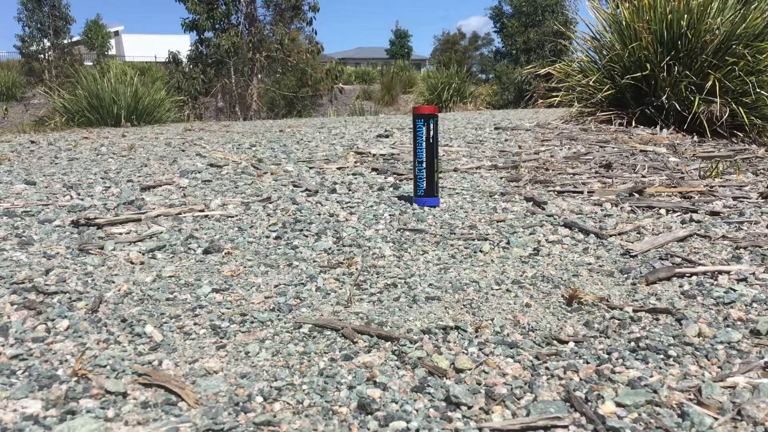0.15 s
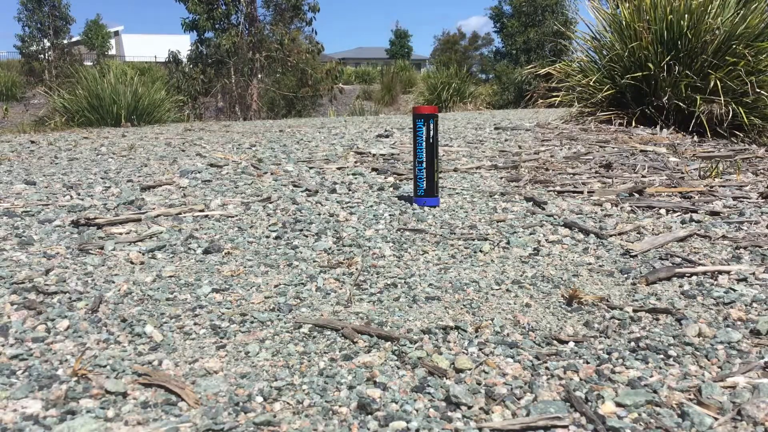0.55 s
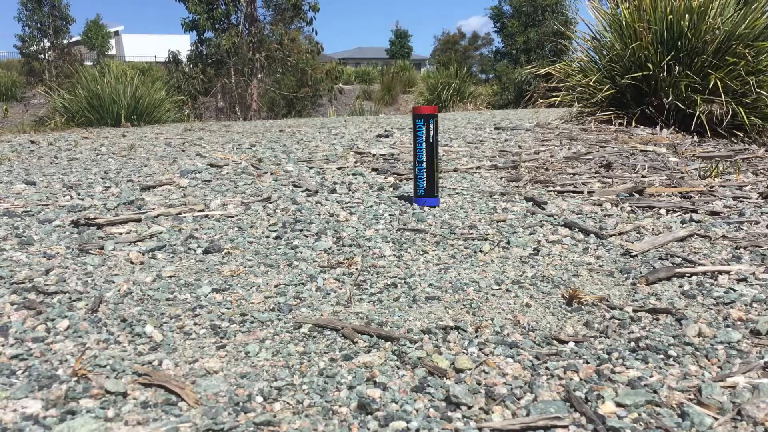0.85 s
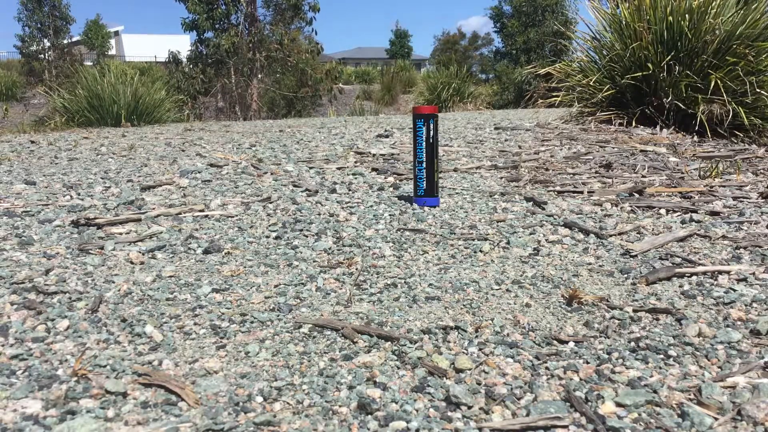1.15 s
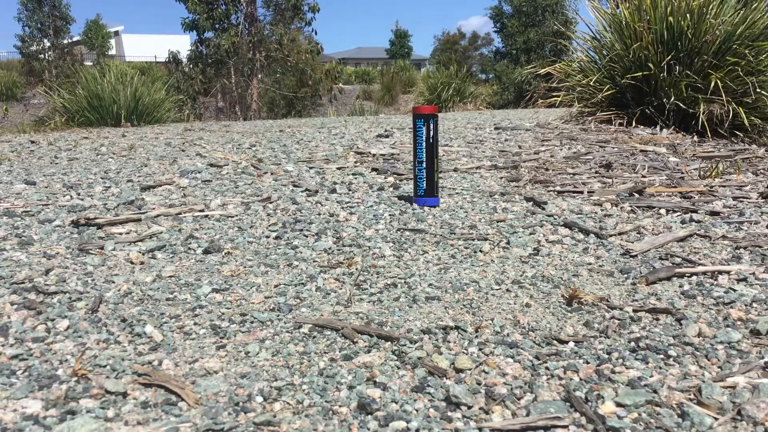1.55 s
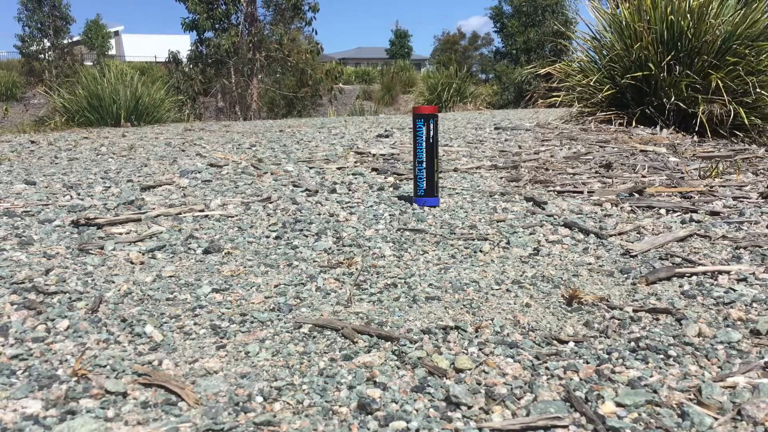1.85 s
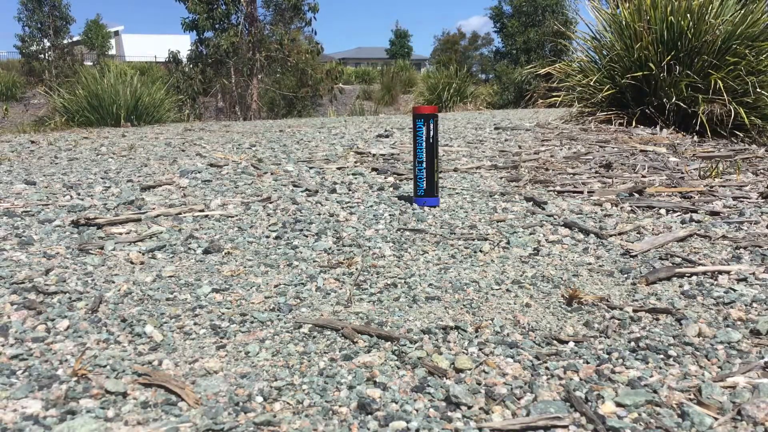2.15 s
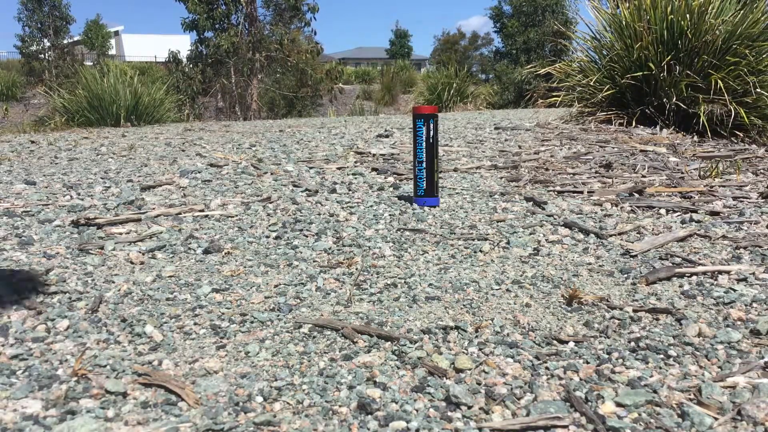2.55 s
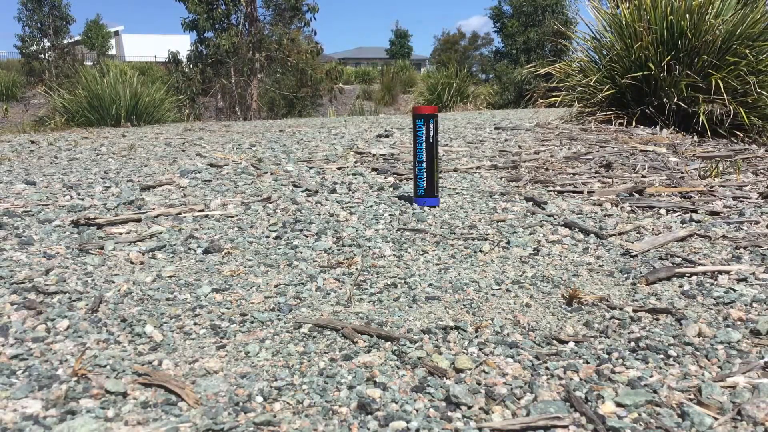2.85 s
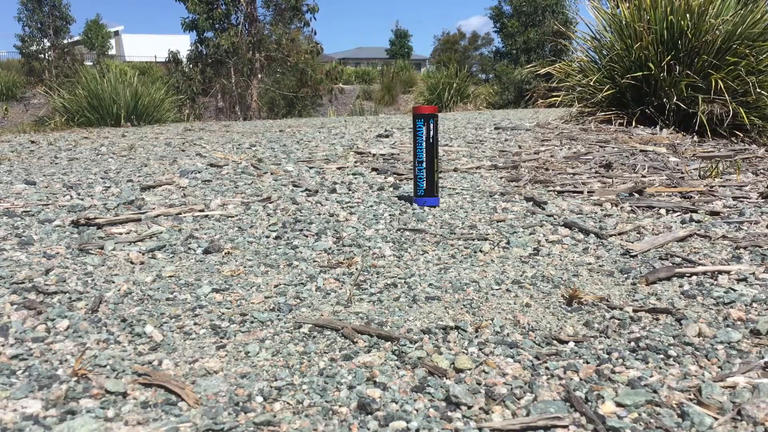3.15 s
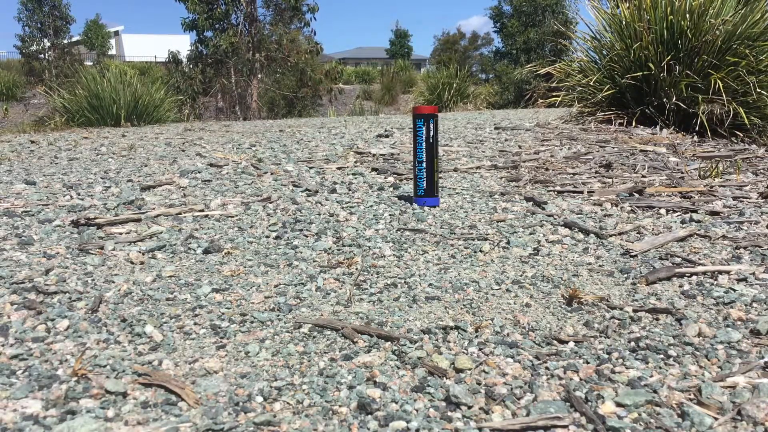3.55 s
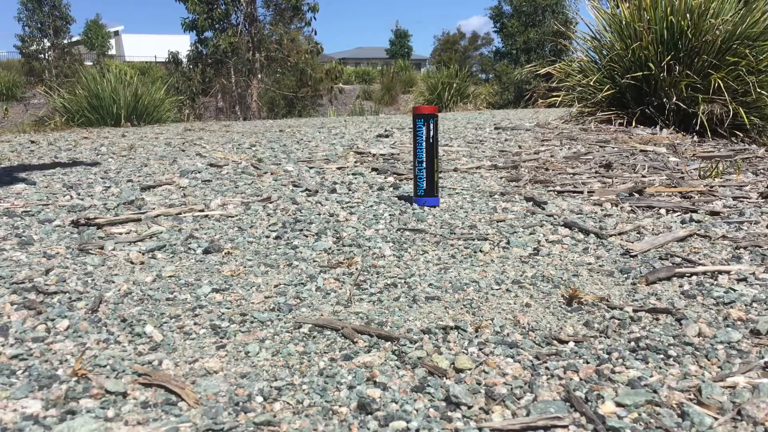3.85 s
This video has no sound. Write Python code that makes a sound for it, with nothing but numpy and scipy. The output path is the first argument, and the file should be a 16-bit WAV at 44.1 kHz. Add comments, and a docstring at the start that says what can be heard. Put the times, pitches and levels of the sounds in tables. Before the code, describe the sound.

Someone shifts lightly on loose stones, pauses, then takes three crisp, crunching gravel steps with dull heel knocks and snapping pebbles, near the microphone in open air with little echo.

```python
"""Footsteps on dry gravel

Someone shifts their feet on dry gravel outdoors, then takes three crunching steps close by.
Damped rings make heel knocks and snapping pebbles; crowds of random stone contacts make crunch and grit.
A soft rustling hiss of filtered noise grows as the walker nears; a low distant rumble lies under it all."""
import sys
import numpy as np
from scipy import signal
from scipy.fft import rfft, irfft
from scipy.io import wavfile
from scipy.ndimage import uniform_filter1d

SR = 44100
rng = np.random.default_rng(int(sys.argv[2]) if len(sys.argv) > 2 else 0)


def wav_out(sig):
    """Save sig, one row per channel (or a flat mono array), as 16-bit PCM at SR to the path in sys.argv[1]."""
    wavfile.write(sys.argv[1], SR, np.round(np.clip(np.atleast_2d(sig).T, -1, 1) * 32767).astype(np.int16))


N = 176400
TIME = np.arange(N) / SR
LEAD_S = 0.003   # a swell reaches its peak this long after its buffer starts


def from_db(db):
    """Amplitude factor of a level in dB."""
    return 10 ** (np.asarray(db) / 20)


def rms_one(x):
    """Scale a signal to rms 1."""
    return x / np.sqrt(np.mean(x ** 2) + 1e-20)


def add(out, s, sound):
    """Mix a sound in at a time in seconds."""
    i = int(np.clip(s * SR, 0, N - 1))
    out[i:i + len(sound)] += sound[:N - i]


def colour(x, spectrum, size=8192):
    """Minimum-phase filter with the shape of the given spectrum; the result has rms 1."""
    hz, db = np.transpose(spectrum)
    bin_hz = np.arange(size // 2 + 1) * SR / size
    gain = from_db(np.interp(np.log(bin_hz + 1), np.log(hz), db))
    # folding the cepstrum onto positive times makes the response causal
    cepstrum = irfft(np.log(gain))[:size // 2]
    cepstrum[1:] *= 2
    response = irfft(np.exp(rfft(cepstrum, size)))
    # the end of the signal runs in ahead of its start, so the filter starts full
    filtered = signal.fftconvolve(np.r_[x[-size:], x], response)
    return rms_one(filtered[size:size + N])


def swell(peak_s, size=1300):
    """A short rounded rise, lasting peak_s, and decay; height 1, with its peak at LEAD_S."""
    t = np.maximum((np.arange(size) / SR - LEAD_S) / peak_s + 1, 0)
    return (t * np.exp(1 - t)) ** 2


def ring(hz, cycles, size=1300):
    """A heavily damped ring: a sine of random phase under a swell that rises for some cycles."""
    phase = 2 * np.pi * (np.arange(size) / SR * hz + rng.random())
    return swell(cycles / hz) * np.sin(phase)


def press(start, length, attack, release):
    """Pressure of a foot: linear attack, hold to the given length, exponential release."""
    t = np.maximum(TIME - start, 0)
    return np.minimum(t / attack, 1) * np.exp(-np.maximum(t - length, 0) / release)


def grains(per_s, spread_db, cycles, share, own_db, count=30, size=1100):
    """Random contacts of uneven strength, each striking a share of damped modes; evened in level."""
    strength = from_db(spread_db * np.minimum(rng.exponential(1, N), 4))
    at = np.flatnonzero(rng.random(N) < per_s / SR)
    out = np.zeros(N)
    draws, signs = rng.random((2, count, 4000)), rng.choice([-1, 1], N)
    for k, hz in enumerate(np.geomspace(250, 15000, count)):
        # a mode falls by 60 dB within the given number of cycles
        radius = from_db(-60 * hz / (cycles * SR))
        angle = 2 * np.pi * hz / SR
        chance, tone = draws[:, k, at % draws.shape[-1]]
        sign = np.roll(signs, k)[at]
        struck = np.zeros(N)
        # own_db is how far the modes of one contact may differ in level
        struck[at] = strength[at] * sign * (chance < share) * from_db(own_db * tone)
        numerator = [1 - radius, 0, radius - 1]
        denominator = [1, -2 * radius * np.cos(angle), radius * radius]
        out += signal.lfilter(numerator, denominator, struck + 1e-18)
    power = uniform_filter1d(uniform_filter1d(out ** 2, size), size)
    return out / np.sqrt(np.abs(power) + 1e-12)


def waver(per_s, size=200):
    """Slow chance between -1 and 1: random points joined by straight lines."""
    return np.interp(TIME * per_s + rng.random(), np.arange(size), rng.uniform(-1, 1, size))


def wandering_band(hz):
    """A narrow band of noise that swells, sinks and drifts in pitch, as noise on a moving carrier."""
    width_hz, changes_per_s = 490, 7
    wander = 0.075   # largest drift, as a fraction of the pitch
    swell_db = 6   # largest swing up or down
    lowpass = signal.butter(2, width_hz / 2, fs=SR, output="sos")
    narrow = signal.sosfilt(lowpass, rng.standard_normal((2, N)))
    phase = 2 * np.pi * np.cumsum(hz * (1 + wander * waver(changes_per_s))) / SR
    band = narrow[0] * np.cos(phase) + narrow[1] * np.sin(phase)
    return from_db(swell_db * waver(changes_per_s)) * rms_one(band)


def background():
    """Distant rumble as low noise, and a soft rustling hiss of shifting colour."""
    # loudness curve of the hiss: t/s, level/dB
    hiss_level = [(0, -74.5), (.14, -69), (.27, -64), (.36, -69.5), (.5, -69), (.6, -73), (.88, -71),
                  (1.02, -67.5), (1.25, -76), (1.62, -69.5), (1.88, -72.5), (2.08, -60.5), (2.33, -60.5),
                  (2.6, -60.5), (2.8, -57), (3.3, -57), (3.58, -57.5), (3.73, -62.5), (4, -56.5)]
    # broadband spectrum of the hiss: f/Hz, relative level per Hz/dB
    hiss_spectrum = [(200, 7), (650, 9), (850, -4), (1200, 6.5), (1750, -1.5), (2500, -1), (4600, -0.5),
                     (6500, -8), (9000, -11.5), (15000, -17.5)]
    # narrow bands that wander in the hiss: centre f/Hz, level against the broadband hiss/dB
    hiss_bands = [(2430, -6.5), (3400, -11.5), (4450, -12.5)]
    # spectrum of the distant rumble: f/Hz, relative level per Hz/dB
    rumble_spectrum = [(22, -65), (40, -16.5), (60, 2), (110, 0), (290, -5.5), (450, -15), (650, -18),
                       (1000, -26), (2000, -55.5), (15000, -46)]
    rumble_db = -59
    rustle = colour(rng.standard_normal(N), hiss_spectrum)
    rustle = rustle + sum(from_db(db) * wandering_band(hz) for hz, db in hiss_bands)
    hiss = from_db(np.interp(TIME, *np.transpose(hiss_level))) * rms_one(rustle)
    return hiss + from_db(rumble_db) * colour(rng.standard_normal(N), rumble_spectrum)


def stone_response(db, size):
    """The snap itself, then ringing stone modes and rattling neighbours, relatively weaker for loud snaps."""
    # modes of the struck stones: f/Hz, gain over the snap/dB
    stone_modes = [(940, 4.5), (1250, 7), (2570, 9.5), (3450, 3), (4450, 5.5)]
    ring_spread = 0.027   # pitch spread between stones, as a fraction
    ring_s, rattle_s = 0.0035, 0.0038   # decay times
    rattle_db = -15
    full_db, loss = -40, 0.35   # above this snap level, dB lost per dB
    t = np.arange(size) / SR
    hits = rng.standard_normal(size) * (rng.random(size) < 0.08)
    rattle = from_db(rattle_db) * hits * np.exp(-t / rattle_s)
    modes = 0
    for mode_hz, mode_db in stone_modes:
        stone_hz = mode_hz * (1 + ring_spread * rng.standard_normal())
        modes = modes + from_db(mode_db) * np.cos(2 * np.pi * stone_hz * t)
    # the factor keeps the gain at resonance independent of ring time
    ringing = modes * np.exp(-t / ring_s) * 2 / (ring_s * SR)
    response = from_db(-loss * max(db - full_db, 0)) * (rattle + ringing)
    response[0] = 1
    return response


def pebbles(size=1300):
    """Each pebble slips, then snaps with a crack that sets stones ringing and neighbours rattling."""
    # single pebbles snapping: t/s of the peak, level/dB, f/Hz
    snaps = [(.053, -43.5, 3155), (.079, -46, 2980), (0.1015, -36, 3250), (.1834, -36.5, 3170),
             (0.2247, -37, 3270), (0.2371, -37.5, 1955), (.4228, -41, 2050), (.452, -40.5, 2990),
             (0.474, -40.5, 2670), (0.49, -47, 2950), (0.639, -42.5, 2780), (.6479, -42, 3650),
             (0.6743, -41, 2700), (0.7085, -48.5, 2580), (0.7477, -44, 3020), (.7611, -45, 2160),
             (.827, -46.5, 2980), (0.88, -32, 1870), (.9546, -47.5, 2910), (1.529, -49, 1780),
             (1.5774, -45.5, 1370), (1.6025, -47, 1970), (1.7005, -44, 1570), (1.7388, -49, 1390),
             (1.7754, -48.5, 1320), (1.8037, -45.5, 1760), (1.827, -51, 1740), (1.9296, -45.5, 2110),
             (1.9604, -42, 2450), (2.065, -29.5, 1780), (2.078, -39, 2600), (2.209, -40.5, 2220),
             (2.5723, -41, 1940), (2.8196, -28.5, 2540), (2.87, -23, 2100), (2.885, -19, 1635),
             (2.934, -36, 4060), (2.9614, -31, 2700), (2.968, -30.5, 1380), (3.1162, -27, 3535),
             (3.1248, -31.5, 3020), (3.153, -28, 3287), (3.1616, -30.5, 3680), (3.2181, -30.5, 3800),
             (3.28, -26.5, 2590), (3.316, -33, 2020), (3.3397, -15, 1595), (3.3635, -23, 1830),
             (3.4141, -10.5, 1210), (3.435, -35, 4600), (3.4584, -30, 1630), (3.4648, -21, 1780),
             (3.4840, -14.5, 3697), (3.4850, -15.5, 1260), (3.5676, -36, 1935), (3.6294, -33.5, 2170),
             (3.6668, -33.5, 1480), (3.757, -38.5, 2060), (3.8049, -25, 2660), (3.8733, -32, 2030),
             (3.877, -26, 1380), (3.9152, -20, 1270), (3.9172, -15, 2335), (3.9665, -40, 2020),
             (3.9887, -28.5, 1400)]
    # tiny bright chips: t/s of the peak, level/dB, f/Hz
    chips = [(3.088, -56, 14500), (3.102, -44.5, 11400), (3.153, -46.5, 13200)]
    snap_cycles, chip_cycles = 0.43, 8   # rise times in cycles
    slip_s, slip_db = 0.00175, -25.5   # lead and level of the slip against the snap
    crack_s, crack_db = 0.00058, -26.5   # rise time and level of the crack against the snap
    crack_hz = 3000   # stones pitched below this crack more softly
    low_hz = 556   # a stone radiates little below this
    out = np.zeros(N)
    for s, db, hz in snaps:
        tone = ring(hz, snap_cycles)
        softness = min(hz / crack_hz, 1) ** 2
        crack = from_db(crack_db) * softness * rng.standard_normal(size) * swell(crack_s)
        snap = from_db(db) * (tone + crack)
        add(out, s - LEAD_S - slip_s, from_db(db + slip_db) * ring(hz, snap_cycles))
        add(out, s - LEAD_S, signal.fftconvolve(snap, stone_response(db, size)))
    for s, db, hz in chips:
        add(out, s - LEAD_S, from_db(db) * ring(hz, chip_cycles))
    highpass = signal.butter(2, low_hz, "high", fs=SR, output="sos")
    return signal.sosfilt(highpass, out + 1e-18)


def shuffles():
    """Fine crackle under a lightly loaded foot, and separate ticks of the stones it loosens."""
    # light shuffles and stones settling: start t/s, level/dB, length/s
    moves = [(0.165, -66.5, 0.075), (0.373, -68.5, 0.16), (1.56, -74.5, 0.12), (1.684, -78, 0.77),
             (2, -68.5, 0.12), (2.974, -61.5, 0.16),]
    # spectrum of crackle and ticks: f/Hz, relative level per Hz/dB
    spectrum = [(150, -23.5), (500, -7), (1200, 0.5), (1800, -5), (2500, -0.5), (4500, -8), (6500, -12.5),
                (9000, -24.5), (15000, -31)]
    attack_s, crackle_release_s, tick_release_s = 0.0031, 0.0029, 0.019
    crackle_per_s, ticks_per_s = 650, 150
    tick_db = 5   # against the crackle

    def load(release):
        """Summed foot pressure of all shuffles."""
        return sum(from_db(db) * press(s, length, attack_s, release) for s, db, length in moves)

    fine = grains(crackle_per_s, spread_db=5.0, cycles=25.0, share=0.25, own_db=32)
    sparse = grains(ticks_per_s, spread_db=5.0, cycles=5.4, share=0.33, own_db=27.0, size=3000)
    crackle = load(crackle_release_s) * colour(fine, spectrum)
    # the slower release lets ticks go on after the foot
    ticks = from_db(tick_db) * load(tick_release_s) * colour(sparse, spectrum)
    return crackle + ticks


def scuffs():
    """The sole slides and sprays grit: dense stone contacts under short bell-shaped swells."""
    # slides of the sole: t/s of the peak, level/dB, half width/s
    slides = [(.215, -62, .035), (1.646, -61.5, 0.012), (2.142, -52.5, 0.025), (3.107, -55, 0.0029),
              (3.309, -43, 0.025), (3.396, -44.5, 0.015), (3.824, -48, 0.0037)]
    # spectrum laid over the grit contacts: f/Hz, relative level per Hz/dB
    grit_spectrum = [(1000, 13), (2500, 3.5), (4500, 13), (6000, 8), (8500, 0), (15000, -4)]
    slide = sum(from_db(db) * np.exp(-0.5 * ((TIME - s) / width) ** 2) for s, db, width in slides)
    grit = grains(7600, spread_db=-1.0, cycles=14.0, share=0.3, own_db=20)
    return slide * colour(grit, grit_spectrum)


def heels():
    """Weight lands as a dull thud of low noise; heel and sole knock on the stones as damped rings."""
    # weight landing on the ground: start t/s, level/dB
    treads = [(2.115, -55), (2.626, -49.5), (2.839, -44), (3.085, -59), (3.286, -41), (3.789, -40.5)]
    # spectrum of the ground under the weight: f/Hz, relative level per Hz/dB
    thud_spectrum = [(30, -60), (70, 2.5), (130, 6), (300, 0), (500, -13), (900, -64), (3000, -40)]
    # heel and sole knocks: t/s of the peak, level/dB, f/Hz
    knocks = [(2.8500, -25, 880), (3.2731, -17, 613), (3.2812, -25.5, 570), (3.2955, -36, 684),
              (3.3160, -18.5, 756), (3.35, -23.5, 990), (3.3774, -28.5, 1020), (3.4860, -28.5, 433),
              (3.7973, -30.5, 467), (3.803, -36.5, 392), (3.830, -36.5, 378)]
    attack_s, hold_s, release_s = 0.011, 0.027, 0.038   # hold counts from the start of the attack
    knock_cycles = 0.78   # rise time in cycles
    weight = sum(from_db(db) * press(s, hold_s, attack_s, release_s) for s, db in treads)
    out = weight * colour(rng.standard_normal(N), thud_spectrum)
    for s, db, hz in knocks:
        add(out, s - LEAD_S, from_db(db) * ring(hz, knock_cycles))
    return out


def footsteps():
    """The sole crunches a crowd of stones as they give way in surges, each of its own brightness."""
    # gravel giving way: start t/s, length/s, level/dB, brightness tilt/dB per octave
    surges = [(2.841, 0.011, -34.5, 0), (2.855, 0.013, -37.5, 0.8), (2.871, 0.025, -49, 2.5),
              (2.893, 0.047, -43, 2.5), (2.946, 0.023, -43, 1.5), (3.273, 0.0061, -29.5, -6.5),
              (3.296, 0.029, -37, 1), (3.331, 0.028, -39, -1.5), (3.369, 0.021, -38.5, -0.2),
              (3.386, 0.01, -42.5, -1.5), (3.423, 0.033, -45, 4.5), (3.789, 0.03, -41.5, 0),
              (3.818, 0.015, -38.5, 2.1), (3.840, .055, -41, 1), (3.905, 0.042, -41.5, 2.5),
              (3.948, 0.015, -43, 0)]
    # spectrum of the crunch before the tilt: f/Hz, relative level per Hz/dB
    crunch_spectrum = [(100, 4.5), (300, 1), (600, -2), (1150, 2), (1700, -3), (2500, -6), (3000, -8.5),
                       (4200, -13.5), (6000, -23.5), (8500, -32), (15000, -45)]
    attack_s, release_s = 0.0043, 0.0062
    stones = grains(2800, spread_db=3.0, cycles=10.4, share=0.17, own_db=12, size=700)
    out = 0
    for s, length, db, tilt in surges:
        tilted = [(hz, level + tilt * np.log2(hz)) for hz, level in crunch_spectrum]
        pressure = from_db(db) * press(s, length, attack_s, release_s)
        out = out + pressure * colour(stones, tilted)
    return out


def outdoors(x, size=8000):
    """Scatter from the ground and bushes: a faint, short tail of decaying noise echoes."""
    echo_db, echo_s = -21.5, 0.033   # level against the direct sound, decay time
    scatter = rng.standard_normal(size) * np.exp(-np.arange(size) / SR / echo_s)
    scatter = scatter / np.sqrt(np.sum(scatter ** 2))
    return x + from_db(echo_db) * signal.fftconvolve(x, scatter)[:N]


def scene():
    """Feet on gravel in the open air, over the rustle and rumble."""
    feet = pebbles() + shuffles() + scuffs() + heels() + footsteps()
    return (background() + outdoors(feet))[None]


def record(dry):
    """The microphone drops the deepest bass; the top is cut steeply."""
    low_cut_hz, cutoff_hz = 41, 15900
    highpass = signal.butter(4, low_cut_hz, "high", fs=SR, output="sos")
    lowpass = signal.ellip(10, 0.1, 70, cutoff_hz, fs=SR, output="sos")
    return signal.sosfilt(lowpass, signal.sosfilt(highpass, dry))


dry = scene()
out = record(dry)
wav_out(out)
```